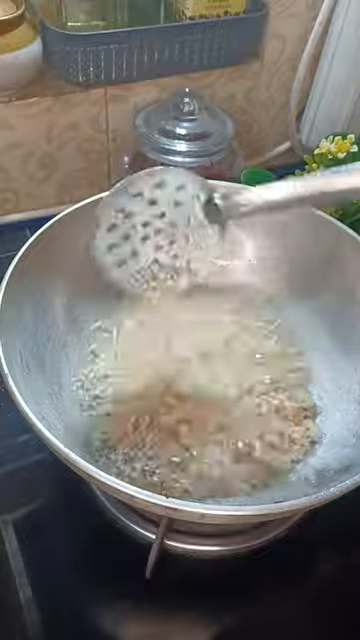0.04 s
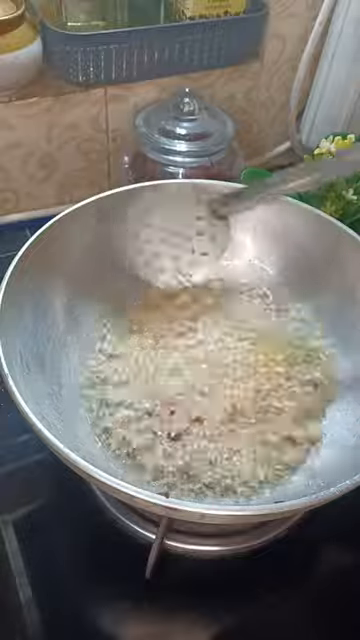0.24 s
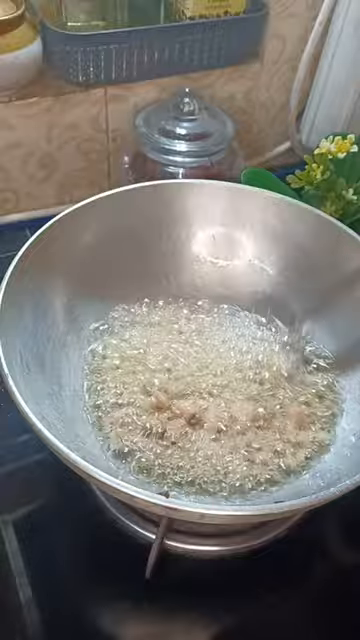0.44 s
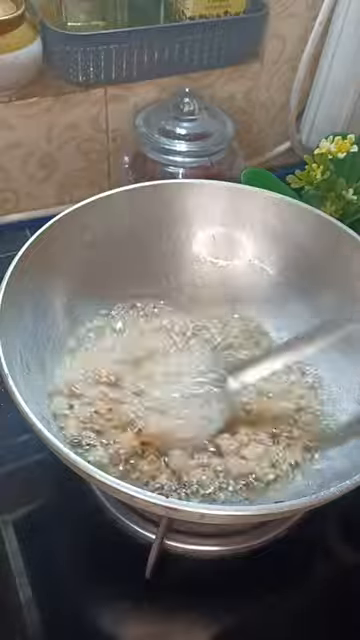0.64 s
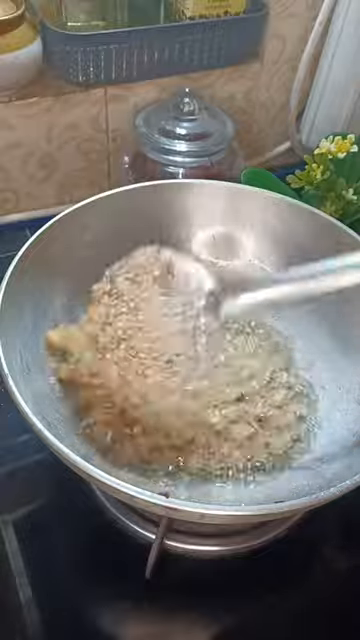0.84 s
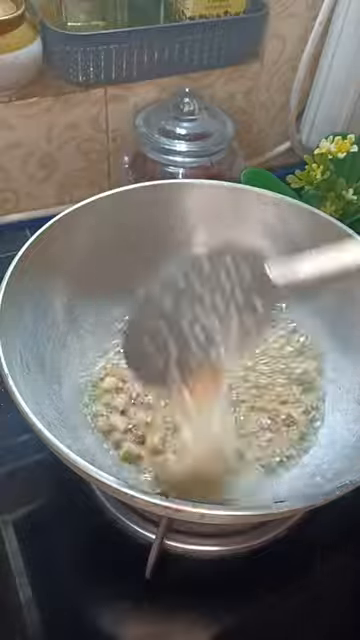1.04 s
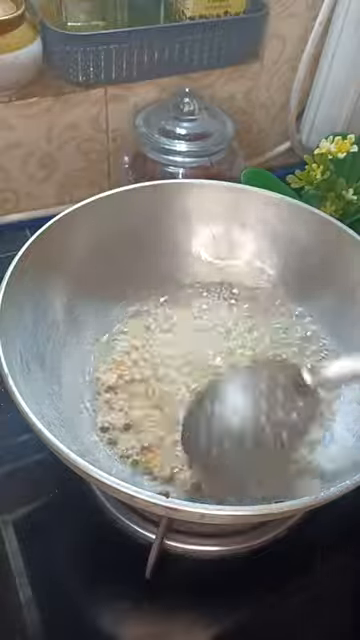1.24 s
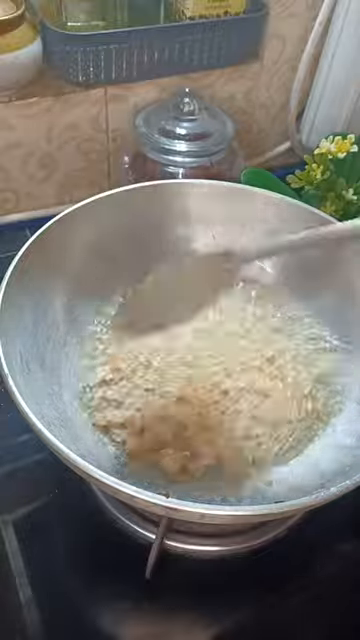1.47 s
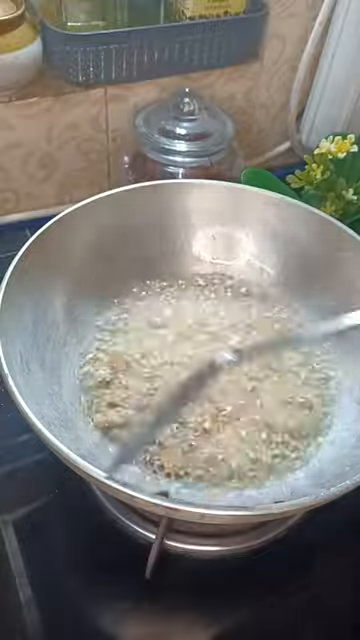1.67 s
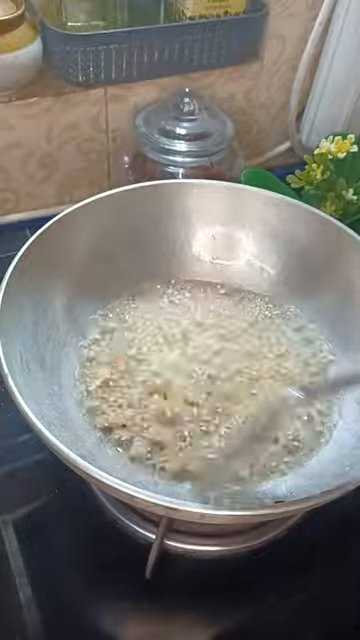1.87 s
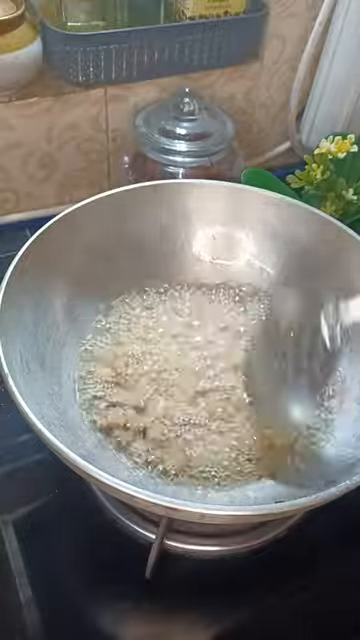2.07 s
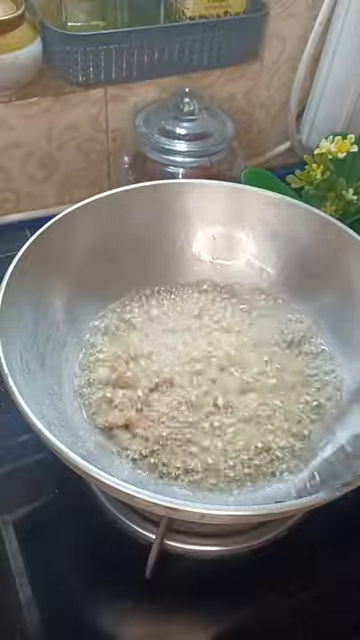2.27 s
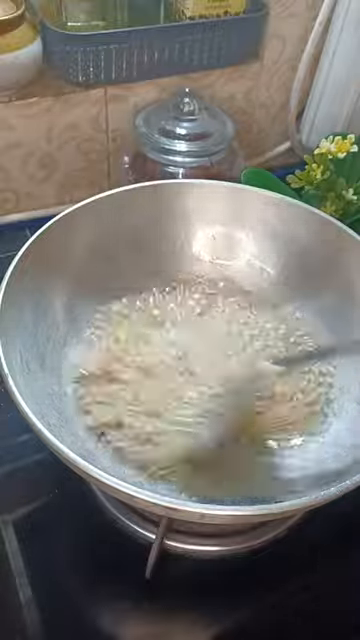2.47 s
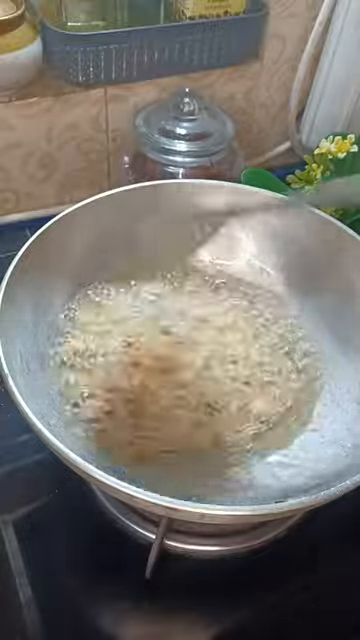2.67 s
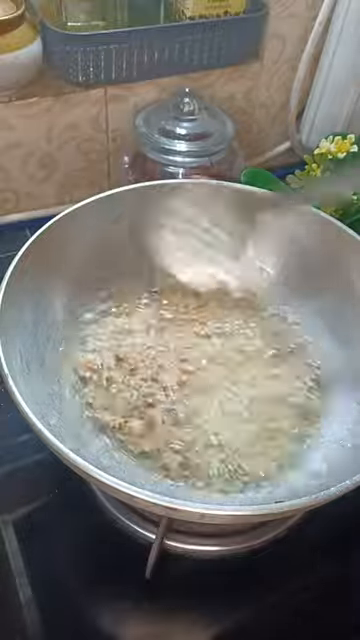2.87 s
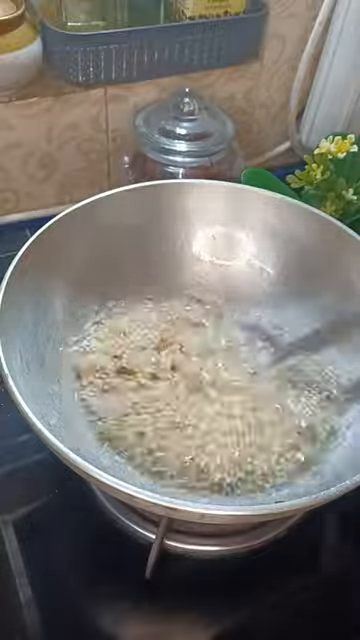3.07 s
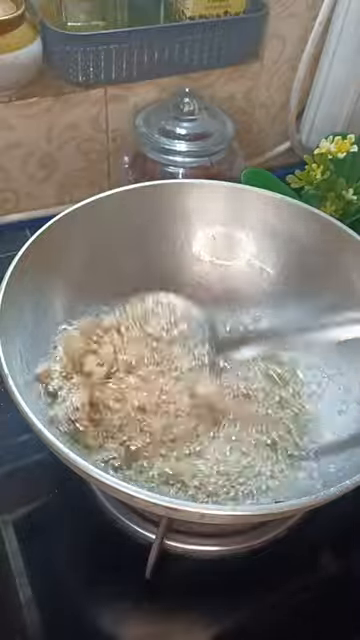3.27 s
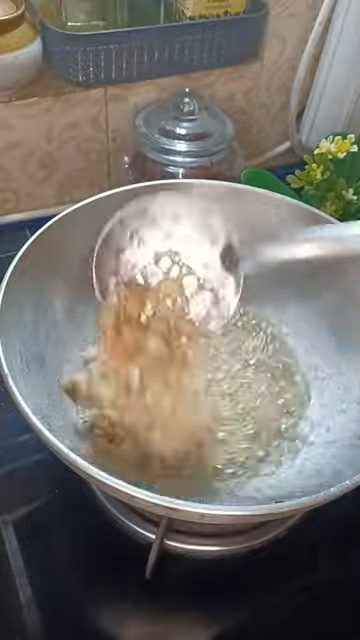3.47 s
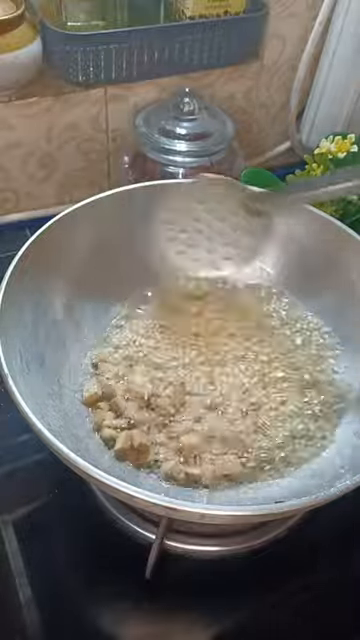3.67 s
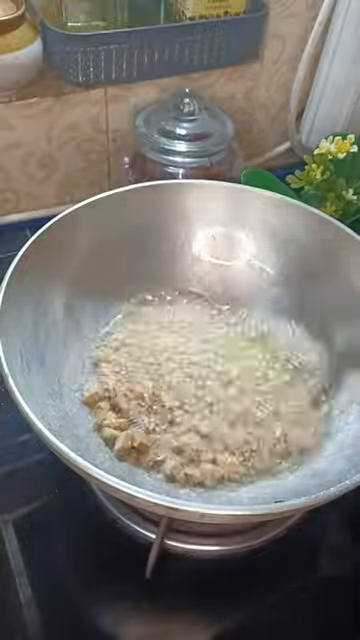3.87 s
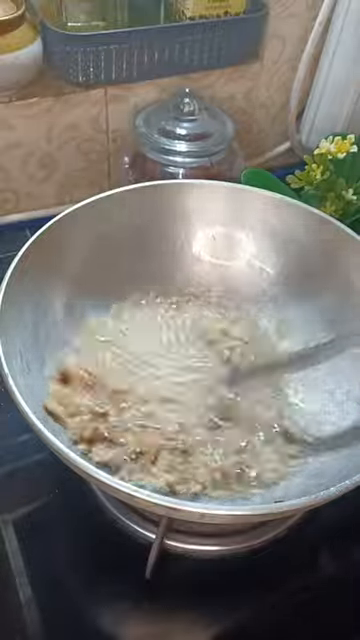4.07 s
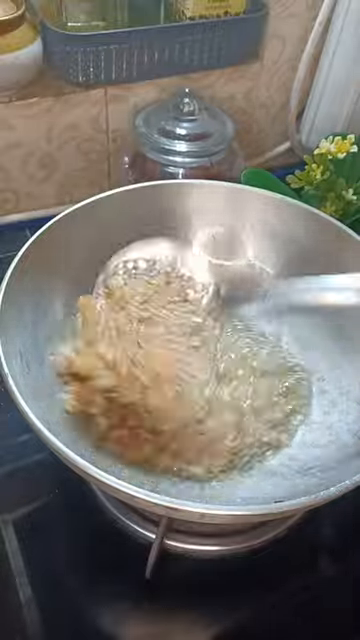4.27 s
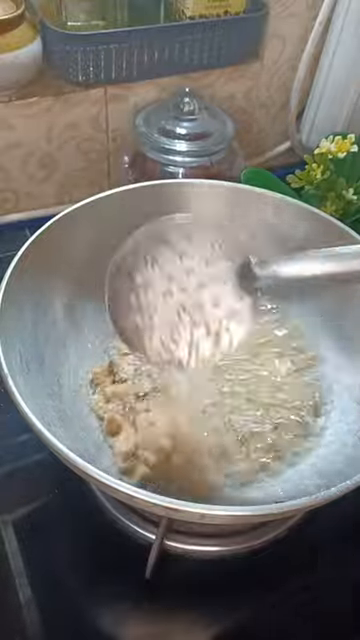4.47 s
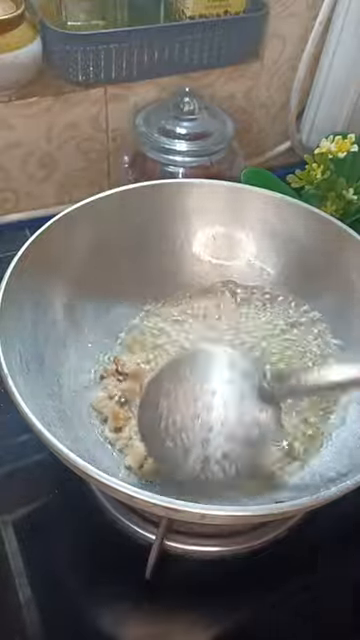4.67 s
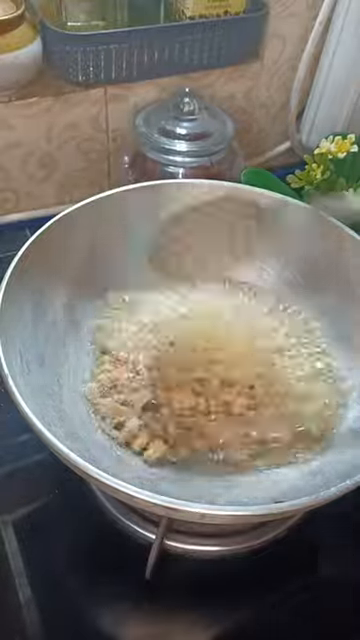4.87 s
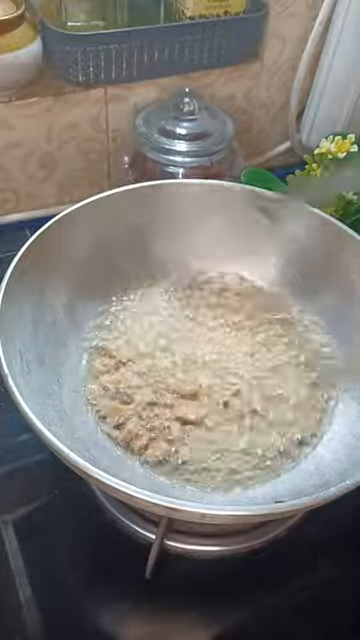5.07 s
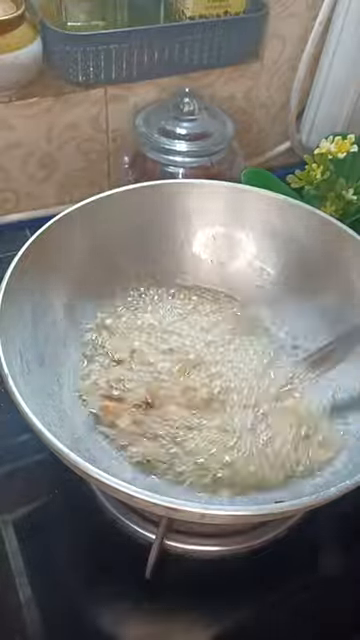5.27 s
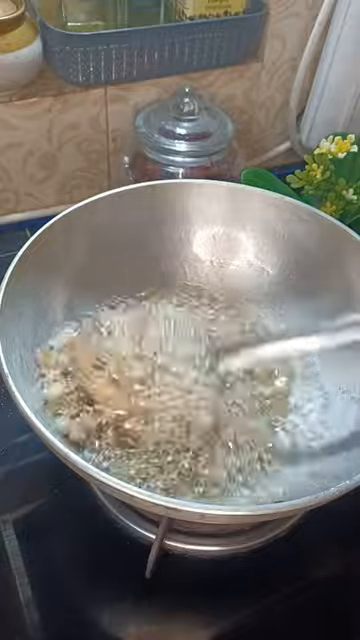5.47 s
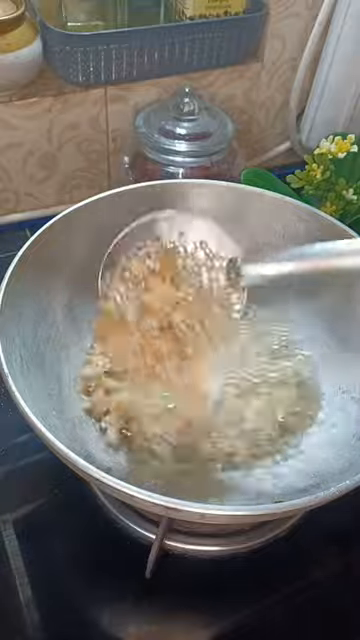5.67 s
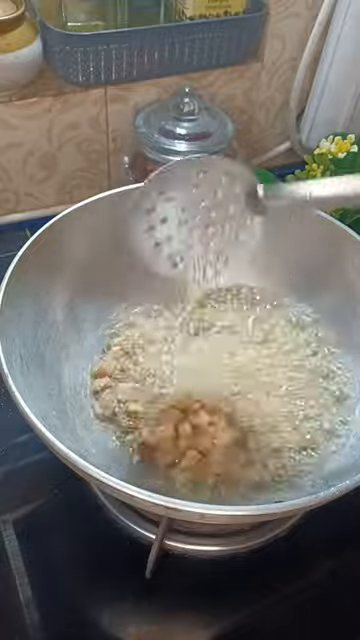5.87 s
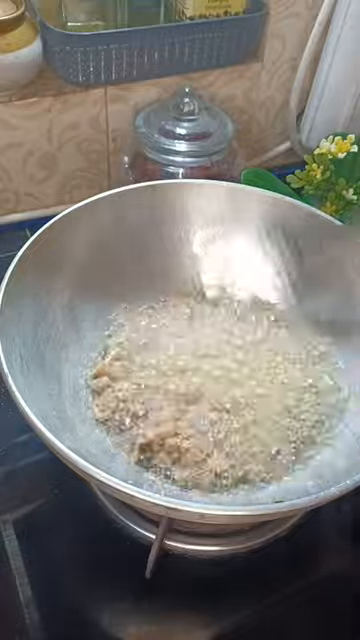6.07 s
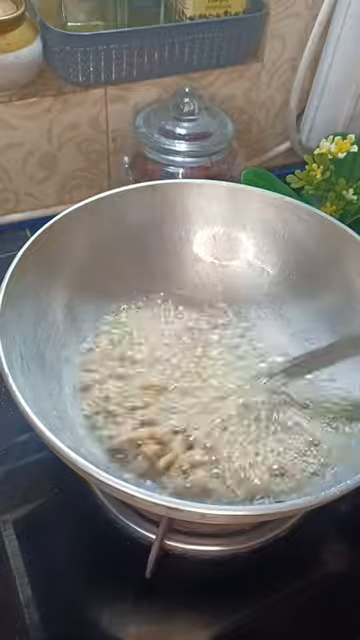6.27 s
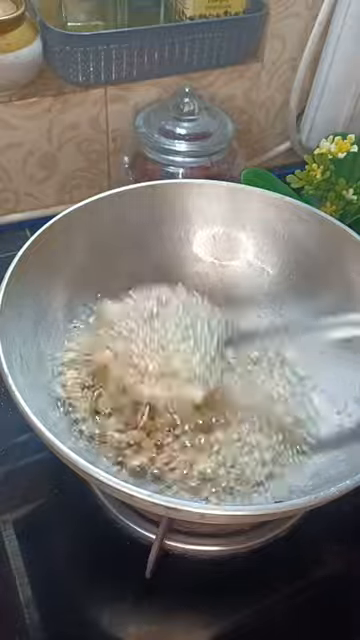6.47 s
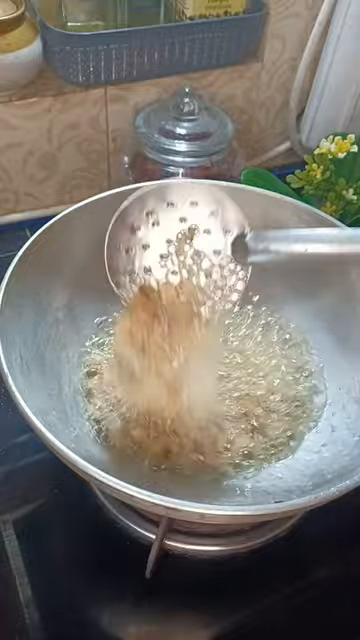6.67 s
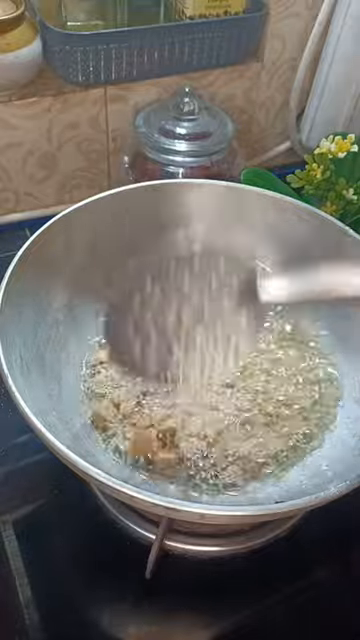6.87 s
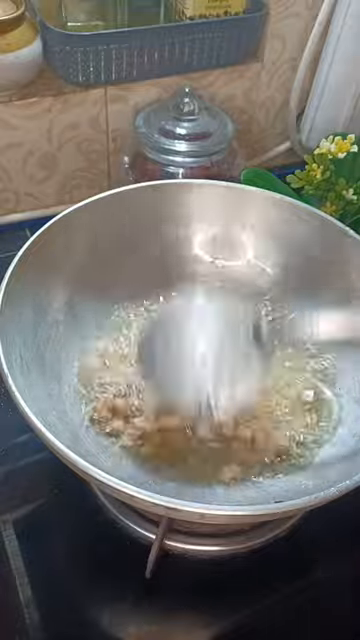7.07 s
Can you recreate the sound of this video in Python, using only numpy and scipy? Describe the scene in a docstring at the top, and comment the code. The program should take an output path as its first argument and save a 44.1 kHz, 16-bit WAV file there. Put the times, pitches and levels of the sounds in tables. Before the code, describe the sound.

Food sizzles steadily in hot oil while a metal spoon repeatedly clanks, scrapes and swishes around a wok.

```python
"""Stir-frying in a wok

A small kitchen, a spaced pair of microphones close to the wok. Morsels sizzle steadily as steam bubbles
burst in the hot oil. Again and again a slotted steel spoon clanks on the wok's wall, scrapes down it and
swishes through the oil. The wok hums and rumbles under each stroke, and now and then the oil spits."""
import sys
import numpy as np
from scipy import signal
from scipy.fft import rfft, irfft
from scipy.io import wavfile
from scipy.ndimage import map_coordinates

SR = 44100
rng = np.random.default_rng(int(sys.argv[2]) if len(sys.argv) > 2 else 0)


def inscribe(sig):
    """Save sig as 16-bit PCM at rate SR to the path in sys.argv[1].

    A 1-D sig is mono; a 2-D sig holds one channel per row.
    Samples are clipped to [-1, 1] before scaling.
    """
    pcm = np.round(np.clip(np.atleast_2d(sig).T, -1, 1) * 32767)
    wavfile.write(sys.argv[1], SR, pcm.astype(np.int16))


N = 313938
CLOCK = np.arange(N) / SR
RING_TIME = np.arange(SR // 2) / SR

# Levels in the tables are relative; each source adds its own gain.
# how hard the oil fries: t/s, sizzle level/dB, treble level/dB
FRYING_LEVELS = [(0.0, -50.5, -52), (0.91, -51.5, -52), (1.31, -49, -49), (1.66, -51, -57),
                 (2.1, -49.5, -59), (2.36, -52, -60), (3.25, -47.5, -53), (3.39, -51, -51),
                 (4.2, -48, -51.5), (4.68, -51, -48), (5.25, -49.5, -54), (5.37, -40, -53),
                 (5.59, -50.5, -50), (7.12, -49.5, -52)]
# spectrum of the bursting bubbles: f/Hz, level/dB
SIZZLE_SPECTRUM = [(25, -37), (150, -13.5), (300, -12.5), (500, -12), (680, -4.5), (820, 5), (1000, -4),
                   (1450, 3.5), (2000, -0.5), (3200, 3), (5200, 1.5), (8700, -2), (13000, 1), (16000, -5.5)]
# how alike the sizzle is at the two microphones: f/Hz, coherence (0-1)
SIZZLE_COHERENCE = [(300, 0.76), (700, 0.57), (1400, 0.29), (4000, 0.14), (12000, 0.08)]
# spoon hits wok: t/s, clank/dB, hollow knock/dB, chatter/s, treble/dB, singing mode f/Hz,
# its level/dB, left over right/dB
SPOON_HITS = [(0.4198, -18, -47, 0.0053, -0.5, 4853, -22, 1.5), (1.3940, -39, -35, 0.004, 1, 4390, -32, 6),
              (1.3975, -16.5, -17.5, 0.0057, 6, 4390, -20.5, -7.5),
              (1.4075, -40, -51, 0.0049, -5, 5060, -12.5, 3.5),
              (1.9145, -64, -51, 0.021, -4, 1445, -40.5, -5),
              (2.5270, -21.5, -35.5, 0.005, 3, 2727, -29, 1),
              (3.0284, -17.5, -54, 0.02, 4, 5140, -34.5, -1.5),
              (3.1548, -27, -33, 0.0015, 2, 11860, -34, 2),
              (3.9318, -14.5, -42, 0.0061, -1, 4910, -29.5, 2),
              (4.8622, -21.5, -17, 0.0013, 6.5, 1484, -25.5, 2.5),
              (5.2022, -30.5, -33.5, 0.015, 16, 7580, -27.5, -4.5),
              (5.2990, -23.5, -59, 0.017, -3, 3890, -37, 1),
              (6.2385, -28, -38.5, 0.0068, 14, 4920, -26.5, 2.5)]
# modes of the steel spoon against the wall: f/Hz, width/Hz, level/dB
STEEL_MODES = [(776, 16, -13), (805, 25, -7.5), (2780, 66, -4.5), (3480, 29, -37), (3620, 7.5, -29),
               (4000, 25, 1), (4390, 25, -53), (4380, 35, -2), (5020, 27, 8), (5457, 19, 1), (5940, 39, -8),
               (6110, 79, 4), (7407, 78, 7), (6980, 33, 9.5), (7580, 42, 8), (8020, 100, 5.5),
               (9180, 33, 5.5), (10210, 52, 0.5), (10350, 54, 3), (10994, 65, 8.5), (11900, 99, 8),
               (12600, 88, 5.5), (12400, 60, -28), (13600, 80, -26), (14350, 39, 13.5), (14400, 57, -33),
               (15400, 50, -19)]
# crack of the spoon's edge: f/Hz, level/dB
CRACK_SPECTRUM = [(40, -45), (300, -14), (480, -37), (780, 15), (1100, -1), (2100, -21), (2800, -4),
                  (4200, 0.5), (4950, 9), (5700, 10.5), (7200, 6), (9000, -25), (13200, 8), (16000, -34)]
# knock of the spoon's bowl: f/Hz, level/dB
KNOCK_SPECTRUM = [(25, -34), (80, -48), (200, -39), (500, -43.5), (720, -15), (1200, -3.5), (2000, -11),
                  (3300, -6), (4200, -12), (6500, -24), (9200, -11.5), (13000, -36), (16000, -25)]
# spoon pushed down the wall and through the oil: t/s, drag/s, scrape start/dB, scrape end/dB, plunge/s,
# swish/dB, swish centre/Hz, hum/dB, hum swell/s, hum fade/(dB/s), rumble/dB, rumble fade/(dB/s)
SPOON_STROKES = [ (0.42, 0.17, -43, -36, 0.17, -39, 1900, -52, 0.017, 222, -41.5, 84),
                 (1.398, 0.13, -50, -39, 0.043, -36.5, 1900, -48.5, 0.081, 119, -32, 116),
                 (1.915, 0.26, -61.5, -33.5, 0.22, -43, 2070, -49, 0.028, 71, -45.5, 25),
                 (2.527, 0.16, -34, -46, 0.099, -40, 1060, -54, 0.084, 110, -41, 63),
                 (3.029, 0.125, -43, -35.5, 0.061, -63, 1500, -49, 0.025, 224, -31, 180),
                 (3.154, 0.21, -41.5, -52, 0.1, -36, 1560, -37, 0.05, 118, -38.5, 83),
                 (3.932, 0.28, -30, -52, 0.12, -40, 1900, -42.5, 0.032, 132, -37.5, 108),
                 (4.863, 0.12, -59, -43.5, 0.057, -37.5, 1160, -39, 0.071, 94, -26, 132),
                 (5.202, 0.29, -40, -46, 0.24, -34, 1720, -40, 0.046, 130, -31, 113),
                 (6.241, 0.16, -31, -38.5, 0.15, -36.5, 1780, -49, 0.041, 35, -40, 17), ]
# friction of steel on steel: f/Hz, level/dB
FRICTION_SPECTRUM = [(300, -25), (1500, 5), (2200, -1), (2700, 13.5), (4200, 8.5), (5000, 9.5),
                     (7500, -6.5), (9500, -6.5), (13000, -1), (16000, -5)]
# upper modes of the wok's bowl: f/Hz, width/Hz, level/dB
WOK_MODES = [(734, 13, 18), (800, 23, 18.5), (1445, 9.7, 15), (1696, 5, -22), (2240, 9, 12),
             (3380, 32, -13)]
# rumble of the wok on its stand: f/Hz, level/dB
RUMBLE_SPECTRUM = [(30, -51), (70, -15), (125, -4.5), (170, -11), (250, -1), (345, -1.5), (385, 1),
                   (470, -5.5), (620, 5), (790, -1), (950, -17.5), (1400, -11.5)]
# oil spits and light taps: t/s, level/dB, centre f/Hz, width/Hz
SPITS_AND_TAPS = [(0.0353, -44, 4870, 4970), (0.7775, -43, 12700, 4000), (0.821, -43, 3440, 800),
                  (1.0892, -37, 2860, 2170), (1.7916, -41, 4300, 2200), (1.821, -31.5, 3470, 920),
                  (2.9546, -46.5, 2780, 1500), (4.185, -39.5, 3220, 1800), (4.248, -44, 7050, 1200),
                  (4.2866, -44, 7600, 600), (4.3131, -43.5, 7300, 600), (4.6968, -43.5, 7350, 2520),
                  (4.7282, -43, 11900, 3000), (4.828, -45, 3130, 3000), (5.028, -40, 12700, 3000),
                  (5.1805, -50, 2820, 2500), (5.9856, -39, 10900, 5000), (6.612, -45, 3030, 1850),
                  (7.0589, -40.5, 11100, 8000)]
# low noise of the kitchen: f/Hz, level/dB
ROOM_SPECTRUM = [(12, -56), (20, -61), (49, -5.5), (119, 8.5), (152, -4.5), (315, 0), (400, -28),
                 (520, -18), (880, -120)]
# kitchen reverberation: f/Hz, t60/s
KITCHEN_DECAY = [(150, 0.63), (1000, 0.25), (5000, 0.26), (14000, 0.26)]


def sizzle(snaps_per_s=14000, level_db=6.0, bright_db=1.5, bubble_db=-12.5, bubble_q=4.4, pan_db=2.5):
    """Steam bubbles burst all over the oil: dense tiny snaps, and larger bubbles that ring briefly."""
    patches = []
    for _ in range(2):
        snaps = rms_one(colour(grains(snaps_per_s, 2.5), SIZZLE_SPECTRUM))
        bubbles = sum(rms_one(resonate(grains(90, 2.9), hz, hz / bubble_q))
                      for hz in np.geomspace(850, 6000, num=16))
        patches.append(snaps + amp(bubble_db) * rms_one(bubbles))
    # the wide pool reaches both microphones alike only in the lows
    alike = at_hz(SIZZLE_COHERENCE, np.arange(N // 2 + 1) * SR / N)
    mid, side = irfft(rfft(np.array(patches)) * np.sqrt([(1 + alike) / 2, (1 - alike) / 2]), N)
    times, *levels = np.transpose(FRYING_LEVELS)
    sizzle_db, treble_db = (np.interp(CLOCK, times, db) for db in levels)
    pool = brighten(np.array([mid + side, mid - side]), bright_db + treble_db - sizzle_db)
    return pan(amp(level_db + sizzle_db) * pool, pan_db)


def spoon_hits(modes_db=-4.0, crack_db=-9.5, bowl_db=-9.5, bite_s=0.0008, ring_s=0.035):
    """The spoon lands and chatters for some milliseconds; the spot it strikes makes one mode sing."""
    clanks, knocks = np.zeros(N), np.zeros(N)
    for s, clank_db, knock_db, chatter_s, treble_db, sing_hz, sing_db, _ in SPOON_HITS:
        # the edge bites gradually, while the spoon's bowl lands all at once
        pressure = np.exp(-RING_TIME / chatter_s) * (1 - np.exp(-RING_TIME / bite_s))
        chatter = burst(grains(5000, 0.61, size=len(RING_TIME)) * pressure)
        blow = chatter + burst(RING_TIME == 0) * np.sqrt(.004 / chatter_s)
        contact_damping = np.exp(-RING_TIME / (ring_s + chatter_s))
        steel = amp(modes_db) * burst(struck_steel(chatter) * contact_damping)
        crack = amp(crack_db) * burst(colour(chatter, CRACK_SPECTRUM))
        sing = amp(sing_db) * burst(resonate(chatter, sing_hz, width_hz=46))
        add(clanks, s, amp(clank_db) * brighten(steel + crack, treble_db) + sing)
        bowl = sum(amp(db) * burst(resonate(blow, hz, width)) for hz, width, db in WOK_MODES)
        knock = burst(colour(blow, KNOCK_SPECTRUM)) + amp(bowl_db) * burst(bowl)
        add(knocks, s, amp(knock_db) * knock)
    heard = kitchen(clanks, wet_db=-4.0, lag_ms=0.02) + kitchen(knocks, wet_db=-4.0, lag_ms=0)
    times, *_, pan_db = np.transpose(SPOON_HITS)
    return pan(heard, np.interp(CLOCK, times, pan_db))


def struck_steel(chatter, detune=0.0132, spread_db=4):
    """The steel's modes ring a little differently from one spot of the wall to the next."""
    spot = rng.standard_normal((len(STEEL_MODES), 2))
    return sum(amp(db + spread_db * louder) * burst(resonate(chatter, hz * (1 + detune * higher), width))
               for (hz, width, db), (louder, higher) in zip(STEEL_MODES, spot))


def scrape(judder_db=3.5, swell_db=3.0, damping=1.2, glide_s=0.000622, grit_db=-1.0):
    """The spoon's edge sticks and slips on the wall, and the slips ring the steel."""
    slips = rms_one(colour(grains(2400, 2.2), FRICTION_SPECTRUM)) * amp(judder_db * drift(54))
    # the modes swell and glide as the contact point moves
    steel = sum(amp(db + swell_db * drift(2.5)) * resonate(slips, hz, damping * width)
                for hz, width, db in STEEL_MODES)
    steel = map_coordinates(steel, [(CLOCK + glide_s * drift(4.08)) * SR], order=3)
    return (rms_one(steel) + amp(grit_db) * rms_one(slips)) * edge_pressure()


def edge_pressure(attack_s=0.021, release_db_per_s=337):
    """Gain of the scrape: pressure on the edge changes evenly along each drag, then lets go."""
    gain = 0
    for s, drag_s, start_db, end_db, *_ in SPOON_STROKES:
        age, gate = since(s, attack_s)
        drag_db = np.interp(age, [0, drag_s], [start_db, end_db])
        gain += gate * amp(drag_db - release_db_per_s * np.maximum(age - drag_s, 0))
    return gain


def swish(level_db=-1.5, spread_octaves=1.0, ring_q=11.3, gurgle_db=2.5):
    """The spoon ploughs through oil and food: a cloud of short rings, lower as it goes deeper."""
    gain, centre = plunge()
    cloud, power = 0, 1e-9
    for hz in np.geomspace(750, 4800, num=22):
        weight = np.exp(-.5 * ((np.log2(hz) - centre) / spread_octaves) ** 2)
        cloud += weight * rms_one(resonate(grains(420, 3.3), hz, hz / ring_q))
        power += weight ** 2
    return amp(level_db + gurgle_db * drift(48)) * gain * cloud / np.sqrt(power)


def plunge(swell_db=24, hold_s=0.025, release_db_per_s=119, sink_octaves_per_s=11.4):
    """Gain and pitch (log2 Hz) of the swish: it swells until the spoon is deepest, holds and dies."""
    gain, weighted_pitch = 1e-12, 0
    for s, _, _, _, plunge_s, db, hz, *_ in SPOON_STROKES:
        age, gate = since(s, attack_s=0.021)
        past_deepest = age - plunge_s
        shallow_db = swell_db * np.minimum(past_deepest / plunge_s, 0) ** 2
        release_db = release_db_per_s * np.maximum(past_deepest - hold_s, 0)
        stroke = gate * amp(db - shallow_db - release_db)
        gain += stroke
        weighted_pitch += stroke * (np.log2(hz) - sink_octaves_per_s * np.minimum(past_deepest, hold_s))
    return gain, weighted_pitch / gain


def froth(level_db=-9.5, band_hz=(1200, 6500)):
    """Stirring frees extra steam: a fizz that rises and falls with the swish."""
    gain, _ = plunge()
    band = signal.butter(2, band_hz, "band", fs=SR, output="sos")
    return amp(level_db) * gain * rms_one(signal.sosfilt(band, grains(6000, 2.3)))


def wok(hum_hz=317.5, hum_db=0.5, wander_rad=1.1, waver_db=3.5, bowl_db=-8.5):
    """Rubbing keeps the wok's lowest mode humming, rings its upper modes and rumbles it on its stand."""
    hum_gain, rumble_gain = shake()
    phase = 2 * np.pi * hum_hz * CLOCK + wander_rad * drift(9.4)
    hum = np.sqrt(2) * np.sin(phase) * amp(hum_db + waver_db * drift(21))
    slips = grains(3000, 1.8)
    bowl = sum(amp(db) * rms_one(resonate(slips, hz, width)) for hz, width, db in WOK_MODES)
    rumble = rms_one(colour(slips, RUMBLE_SPECTRUM)) + amp(bowl_db) * rms_one(bowl)
    return hum * hum_gain + kitchen(rumble * rumble_gain, wet_db=-11.5, lag_ms=0.13)


def shake(swell_db=8, contact_s=0.35, lift_db_per_s=200):
    """Gains of hum and rumble: a stroke jolts the wok at once, while the hum builds up; both fade."""
    hum, rumble = 0, 0
    for s, *_, hum_db, swell_s, hum_fade, rumble_db, rumble_fade in SPOON_STROKES:
        age, hum_gate = since(s, attack_s=0.0049)
        _, rumble_gate = since(s, attack_s=0.0067)
        lift_db = lift_db_per_s * np.maximum(age - contact_s, 0)  # the spoon leaves the wok
        below_peak_db = swell_db * np.maximum(1 - age / swell_s, 0)
        below_peak_db += hum_fade * np.maximum(age - swell_s, 0)
        hum += hum_gate * amp(hum_db - below_peak_db - lift_db)
        rumble += rumble_gate * amp(rumble_db - rumble_fade * age - lift_db)
    return hum, rumble


def spits_and_taps(snap_s=0.00033):
    """Single spits of oil and light touches of the spoon, each a tiny snap in its own band."""
    track = np.zeros(N)
    for s, db, hz, width in SPITS_AND_TAPS:
        snap = rng.standard_normal(len(RING_TIME)) * np.exp(-RING_TIME / snap_s)
        add(track, s, amp(db) * burst(resonate(resonate(snap, hz, width), hz, 2 * width)))
    return track


def room_tone(level_db=-75.5):
    """Faint low noise of the kitchen."""
    noise = rms_one(colour(rng.standard_normal(N), ROOM_SPECTRUM))
    return kitchen(amp(level_db) * noise, wet_db=-19.0, lag_ms=0.042)


def kitchen(x, wet_db, lag_ms, early_db=-5.0, early_s=0.007):
    """Direct sound at the spaced pair, quick echoes of wok and wall, a tail that dies band by band."""
    hz = np.arange(len(RING_TIME) // 2 + 1) * SR / len(RING_TIME)
    white = rfft(rng.standard_normal((2, len(RING_TIME))))
    tail = 0
    for centre, t60 in KITCHEN_DECAY:
        share = at_hz([(f, f == centre) for f, _ in KITCHEN_DECAY], hz)
        tail += irfft(white * share) * amp(-60 * RING_TIME / t60)
    early_fade = np.exp(-RING_TIME / early_s)
    early = rng.standard_normal(tail.shape) * early_fade * (RING_TIME > .001)
    tail *= 1 - early_fade
    arrival_samples = 12 + np.array([[-.5], [.5]]) * lag_ms * SR / 1000
    direct = np.sinc(RING_TIME * SR - arrival_samples)
    response = burst(direct) + amp(early_db) * burst(early) + amp(wet_db) * burst(tail)
    response *= np.sqrt(2 / np.sum(response ** 2))
    return signal.oaconvolve(x[None], response, axes=1)[:, :N]


def grains(per_s, spread_db, size=N):
    """Random clicks of either sign, many small and a few up to six steps of spread_db larger."""
    draw, chance, clicks = rng.uniform(-1, 1, size), per_s / SR, np.zeros(size)
    born = np.abs(draw) < chance
    rarity = np.minimum(np.log(chance / np.abs(draw[born])), 6)
    clicks[born] = np.sign(draw[born]) * amp(spread_db * rarity)
    return clicks


def drift(rate_hz):
    """Smooth random wander of rms 1."""
    r = np.exp(-80 * np.pi * rate_hz / SR)  # one step per 40 samples
    slow = signal.lfilter([1], [1, -2 * r, r * r], rng.standard_normal(N // 40 + 2002))[2000:]
    return np.interp(np.arange(N) / 40, np.arange(len(slow)), rms_one(slow))


def resonate(x, hz, width_hz):
    """One resonance, with gain 1 at its peak."""
    r = np.exp(-np.pi * width_hz / SR)
    feedback = [1, -2 * r * np.cos(2 * np.pi * hz / SR), r * r]
    return signal.lfilter(np.array([1, 0, -1]) * (1 - r * r) / 2, feedback, x + 1e-18)


def colour(x, spectrum, size=4096):
    """Causal (minimum-phase) filter with the given spectrum."""
    cepstrum = irfft(np.log(amp(at_hz(spectrum, np.arange(size // 2 + 1) * SR / size))))
    cepstrum[1:size // 2] *= 2
    cepstrum[size // 2 + 1:] = 0
    return signal.oaconvolve(x, irfft(np.exp(rfft(cepstrum))))[:len(x)]


def brighten(x, treble_db, corner_hz=8000):
    """Treble shelf."""
    treble = signal.sosfilt(signal.butter(1, corner_hz, "high", fs=SR, output="sos"), x)
    return x + (amp(treble_db) - 1) * treble


def pan(x, db):
    """Raise the left microphone over the right by db."""
    return x * amp(db * np.array([[.5], [-.5]]))


def since(s, attack_s):
    """Time since a moment, and a gate that opens then."""
    age = np.maximum(CLOCK - s, 0)
    return age, np.minimum(age / attack_s, 1)


def add(track, s, sound):
    """Mix a short sound in at a time."""
    start = round(s * SR)
    track[start:start + len(sound)] += sound[:N - start]


def at_hz(points, hz):
    """Read a table on a log-frequency axis."""
    f, value = np.transpose(points)
    return np.interp(np.log(hz + 1e-9), np.log(f), value)


def burst(x):
    """Scale a short sound to the energy of ten milliseconds at rms 1."""
    return x * np.sqrt(0.01 * SR / (np.sum(x ** 2) + 1e-20))


def rms_one(x):
    """Scale to rms 1."""
    return x / np.sqrt(np.mean(x ** 2) + 1e-20)


def amp(db):
    """Decibels to gain."""
    return 10 ** (np.asarray(db) / 20)


def scene():
    """Oil, spoon and wok in front of the microphones, the kitchen behind."""
    stirring = amp(0.5) * kitchen(scrape() + swish() + froth(), wet_db=-2.0, lag_ms=0.11)
    spits = amp(1.5) * kitchen(spits_and_taps(), wet_db=-2.5, lag_ms=0.022)
    return sizzle() + amp(1.0) * spoon_hits() + stirring + spits + wok() + room_tone()


def record(dry, cutoff_hz=15800):
    """The right microphone is a little brighter; peaks are rounded and the top is cut."""
    heard = np.tanh(brighten(dry, treble_db=[[-1.5], [1.5]], corner_hz=7000))
    return signal.sosfilt(signal.ellip(10, .3, 70, cutoff_hz, fs=SR, output="sos"), heard)


dry = scene()
out = record(dry)
inscribe(out)
```